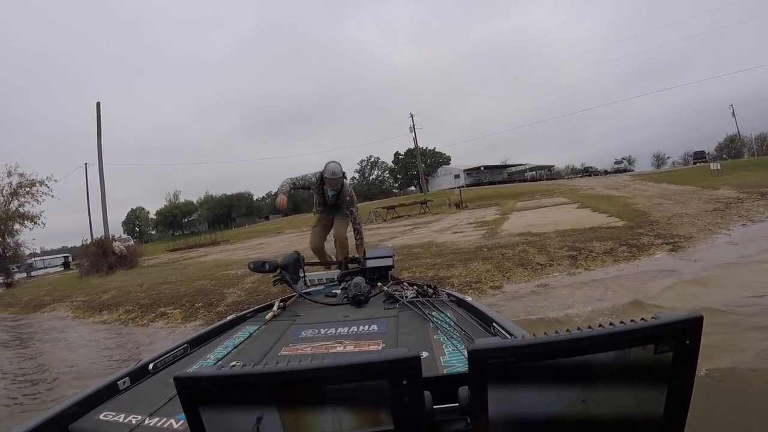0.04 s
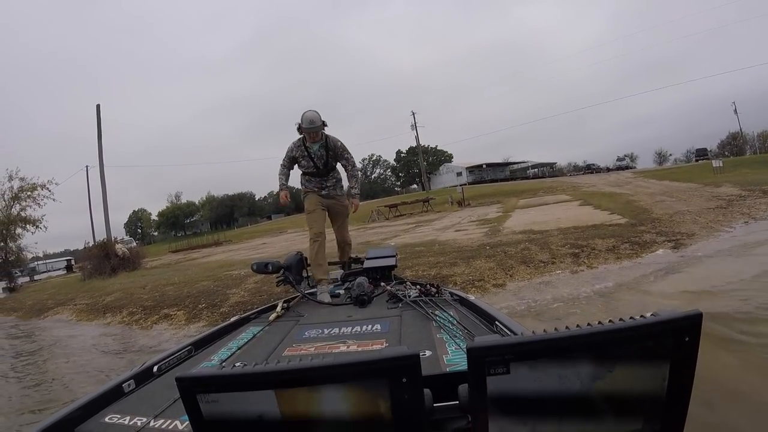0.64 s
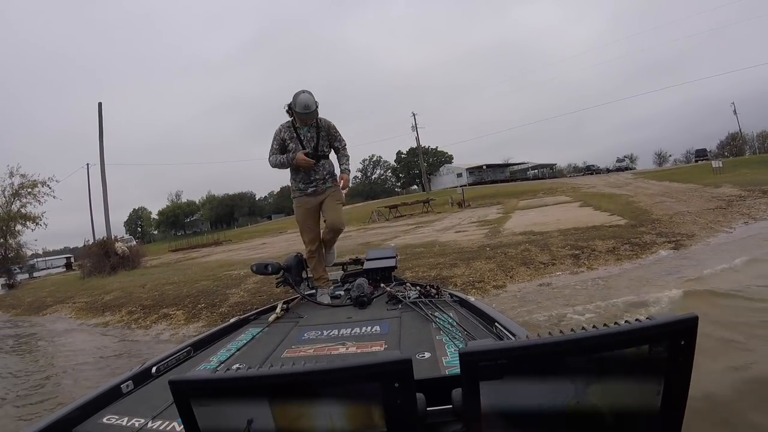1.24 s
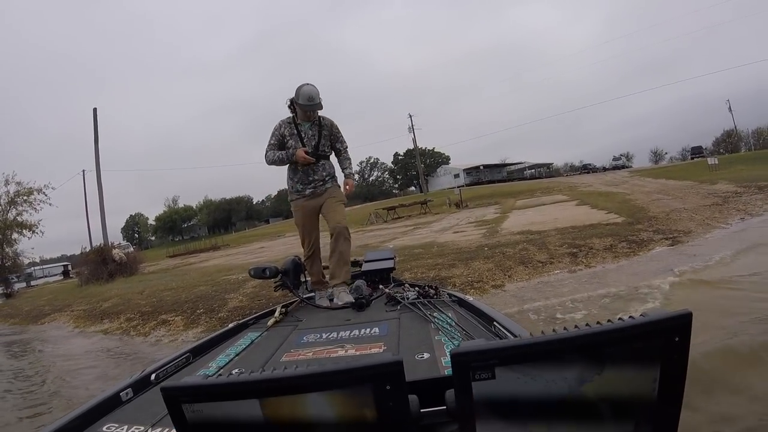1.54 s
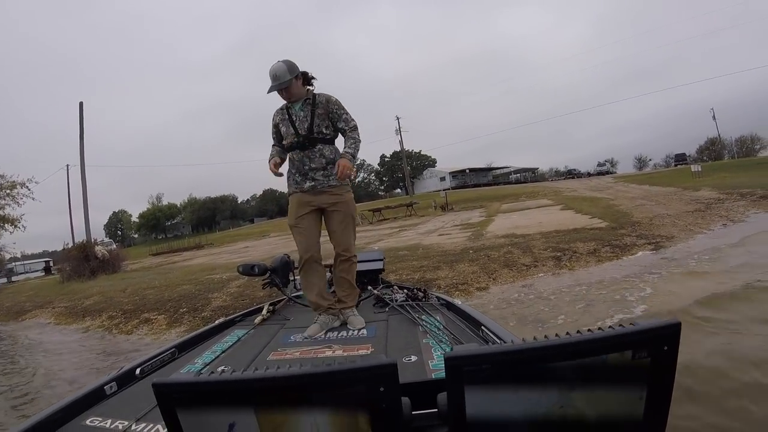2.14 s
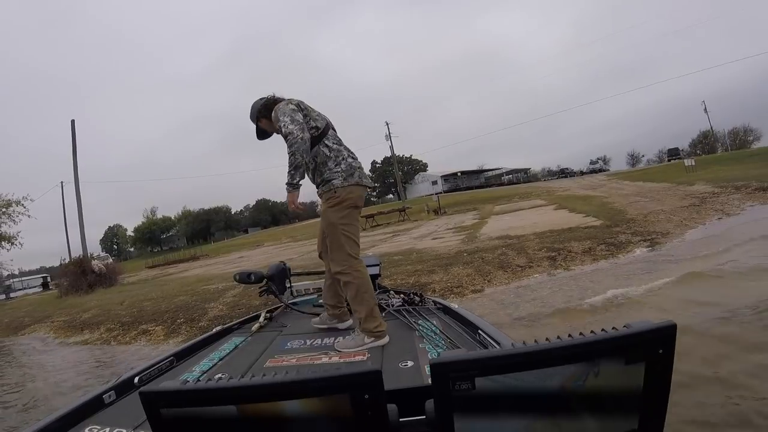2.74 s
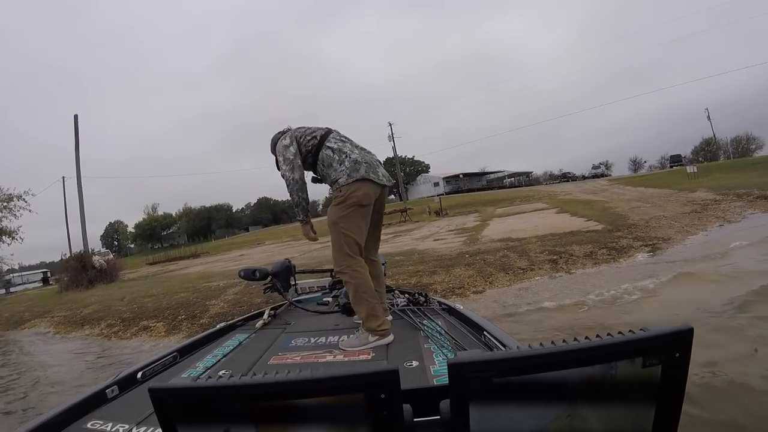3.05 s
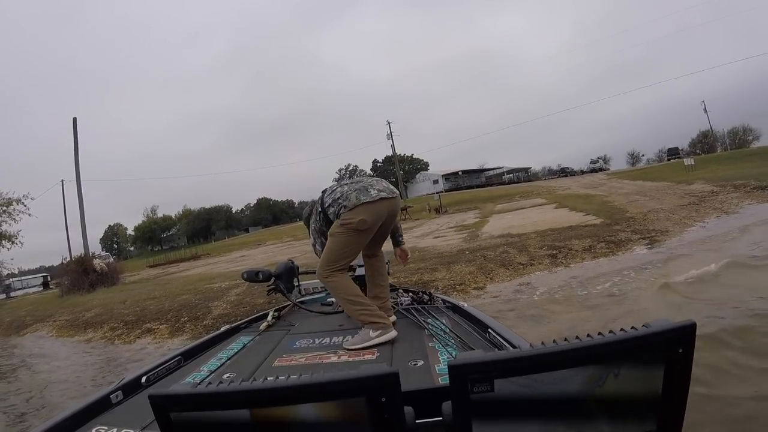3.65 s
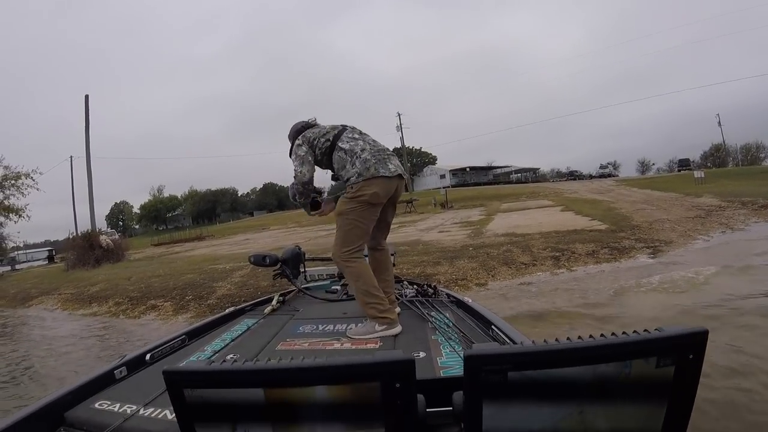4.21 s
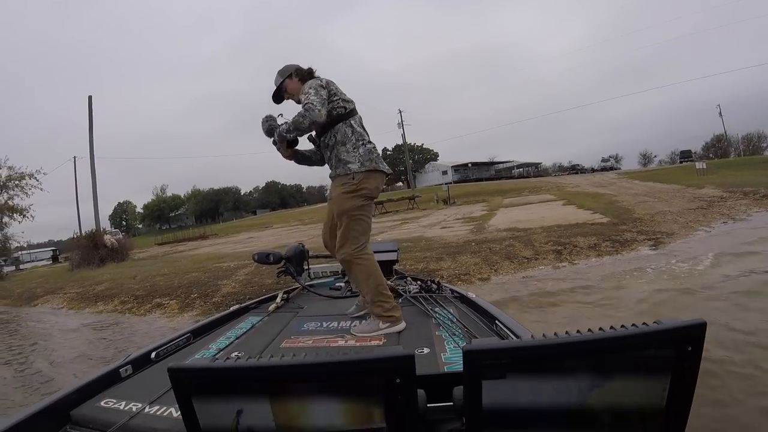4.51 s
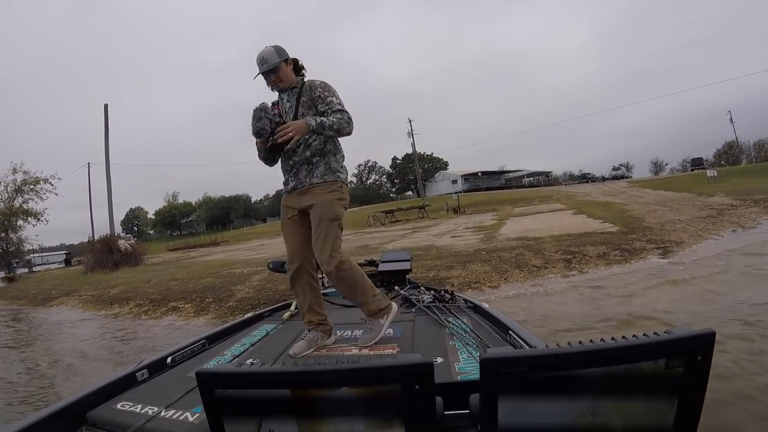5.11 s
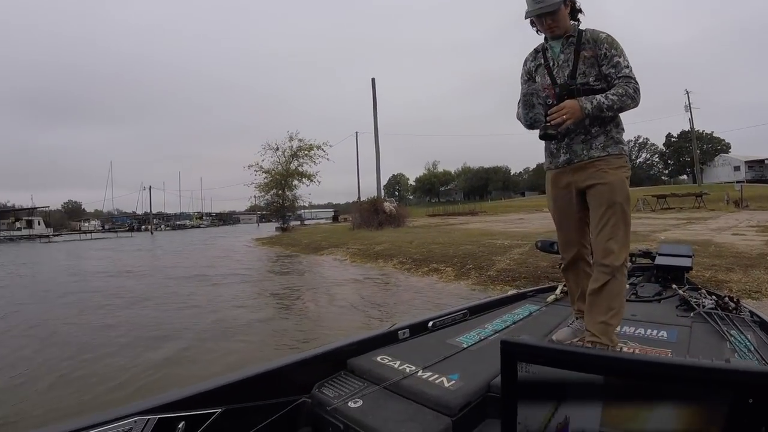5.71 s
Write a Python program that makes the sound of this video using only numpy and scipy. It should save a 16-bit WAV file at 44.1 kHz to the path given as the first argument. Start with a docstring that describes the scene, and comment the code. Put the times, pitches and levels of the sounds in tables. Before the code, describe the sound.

A boomy thud and sharp clicks sound as someone hops onto a boat deck, over the loud low hum of an outboard motor. The engine slows, climbs to a rough, whining drone about halfway through, then settles slightly. Lake water fizzes and plops around the hull while hollow footsteps, shoe scuffs and small gear clicks come and go. Gusts of wind buffet the onboard microphone more toward the end.

```python
"""An outboard motor hums through the hull of a fishing boat backing away from a lake shore.
Heard from the console, the hum swells with the throttle, the engine cover drones and clatters,
and the exhaust burbles under water. Churned water hisses and small waves plop under the hull.
Someone hops onto the bow and walks the hollow deck, soles scuff and loose gear clicks.
Wind rumbles louder as the boat gathers speed."""
import sys
import numpy as np
from scipy import signal
from scipy.fft import rfft, irfft
from scipy.io import wavfile

SR = 44100
rng = np.random.default_rng(int(sys.argv[2]) if len(sys.argv) > 2 else 0)


def generate_wav(sig):
    """Save sig (samples, or channels by samples) to the path in sys.argv[1] as 16-bit PCM at SR."""
    pcm = np.round(np.clip(np.atleast_2d(sig).T, -1, 1) * 32767).astype(np.int16)
    wavfile.write(sys.argv[1], SR, pcm)


N = 254456

# How fast the engine's crankshaft spins: (time [s], speed [turns per s])
ENGINE_SPEED = [(0.0, 39.1), (0.14, 38.3), (0.29, 34.9), (0.48, 28.5), (1.0, 30), (1.48, 31.7),
                (1.86, 37.1), (2.2, 46.3), (2.39, 47.5), (2.96, 49.7), (3.42, 56), (3.7, 54.4), (4.0, 51.1),
                (4.45, 47.8), (5.0, 46.8), (5.77, 44.1)]
def crankshaft(cruise_hz=45):
    """The shaft sets the engine's pace: its speed, its turns so far, and octaves above cruising speed."""
    speed, = in_time(ENGINE_SPEED)
    return speed, np.cumsum(speed) / SR, np.log2(speed / cruise_hz)


# How well each pitch comes through the hull: (pitch [Hz], level [dB])
HULL_RESPONSE = [(30, -15), (52, -31.5), (61, -43), (70, -57), (90, -27), (100, -21), (112, -19.5),
                 (124, -20), (142, -27.5), (158, -33.5), (188, -31), (210, -39.5), (234, -33), (262, -48),
                 (295, -41), (345, -36.5), (378, -36.5), (405, -48), (480, -50)]
# Tones of the uneven cylinders. An "order" is a multiple of the shaft's speed: (order, level [dB])
ENGINE_ORDERS = [(1, -3.5), (2, 2.5), (3, 1.5), (4, -3), (5, -12), (6, -5.5), (7, -7), (8, -4.5), (9, -15)]
def engine_hum(speed, turns, octaves, idle_hz=29, smooth_hz=42, throb_depth=0.3):
    """Each engine tone swells as it glides through a hull resonance; near idle the firing is lumpy."""
    out = np.zeros(N)
    idling = np.clip((smooth_hz - speed) / (smooth_hz - idle_hz), 0, 1)
    for order, order_db in ENGINE_ORDERS:
        flutter_db = 0.5 * drift(rate_hz=6) + 2.8 * idling * drift(rate_hz=18)
        waver = 0.2 * drift(rate_hz=27) + 0.5 * idling * drift(rate_hz=18)
        level_db = at_hz(HULL_RESPONSE, order * speed) + order_db + flutter_db
        phase = 2 * np.pi * (order * turns + rng.random()) + waver
        out += from_db(level_db) * np.sqrt(2) * np.sin(phase)
    throb = 1 + throb_depth * drift(rate_hz=45)  # uneven firing
    return from_db(-0.63 + 1.5 * octaves) * throb * out


# The engine cover's nasal drone: (time [s], centre pitch [Hz], level [dB])
LOW_DRONE = [(0.0, 770, -50), (0.45, 815, -52), (0.7, 773, -40.5), (1.0, 767, -48), (1.4, 802, -49.5),
             (1.87, 765, -38), (2.05, 814, -36), (2.4, 833, -42.5), (2.95, 837, -49), (3.12, 805, -39),
             (3.33, 800, -30), (3.48, 815, -41), (3.65, 816, -37), (3.8, 830, -47), (3.92, 770, -31),
             (4.04, 805, -42), (4.13, 850, -34.5), (4.26, 876, -34.5), (4.38, 892, -42), (4.5, 817, -34),
             (4.68, 830, -43), (5.0, 833, -48.5), (5.77, 775, -44)]
# A higher tone that joins near full throttle: (time [s], centre pitch [Hz], level [dB])
MIDDLE_WHINE = [(0.0, 940, -70), (2.9, 925, -54), (3.15, 955, -46), (3.32, 1000, -40), (3.5, 950, -47),
                (3.72, 927, -38), (3.95, 960, -52), (4.25, 1030, -48), (4.7, 1006, -53), (5.77, 1024, -71)]
# The highest, thinnest whine: (time [s], centre pitch [Hz], level [dB])
HIGH_WHINE = [(0.0, 1320, -68), (1.45, 1245, -53), (1.63, 1320, -42), (1.85, 1290, -53),
              (2.25, 1225, -42.5), (2.55, 1240, -52), (2.88, 1254, -45), (3.1, 1230, -50),
              (3.36, 1180, -37), (3.5, 1150, -43), (3.65, 1183, -39.5), (3.85, 1140, -37.5),
              (4.05, 1175, -42), (4.22, 1250, -40), (4.7, 1240, -50), (5.77, 1206, -57)]
def cover_drone(speed, turns, curve, width_hz, wobble, rough_db=1.5):
    """Close, wavering engine tones pass through one resonance of the cover and beat into a rough drone."""
    centre_hz, db = in_time(curve)
    centre_order = centre_hz / speed
    tones = np.zeros(N)
    for order in range(int(centre_order.min()), int(centre_order.max()) + 2):
        off_centre = 2 * (order * speed - centre_hz) / width_hz
        phase = 2 * np.pi * (order * turns + rng.random()) + wobble * drift(rate_hz=14)
        tones += from_db(rough_db * drift(rate_hz=30)) * np.sin(phase) / (1 + off_centre ** 4)
    return from_db(db) * rms_one(tones)


# The deep tone of the underwater exhaust: (pitch [Hz], relative level [dB])
EXHAUST_SPECTRUM = [(45, 1.5), (80, 4), (120, -0.5), (175, 1), (215, -5), (265, -10), (310, -8.5),
                    (375, -12), (420, -24.5), (620, -34), (1000, -36.5)]
def exhaust(turns, octaves, pulse_depth=0.44):
    """Gas leaves the propeller hub in lumps, three firings a turn, louder as the engine speeds up."""
    pulses = 1 + pulse_depth * np.cos(2 * np.pi * 3 * turns)
    gas = rng.standard_normal(N) * pulses * from_db(-1.5 * drift(rate_hz=6.2))
    return from_db(-24.5 + 10 * octaves) * colour(gas, EXHAUST_SPECTRUM)


# How hard the engine works, heard as the loudness of its clatter: (time [s], level [dB])
ENGINE_LOAD = [(0.0, -41.5), (0.63, -38.5), (0.79, -38.5), (1.04, -38), (1.49, -41), (2.04, -35),
               (3.05, -32), (3.21, -32.5), (3.55, -32), (3.81, -32), (5.41, -37), (5.77, -37)]
# The tone of rushing air and tapping valves: (pitch [Hz], relative level [dB])
CLATTER_SPECTRUM = [(300, -3.5), (520, 6.5), (620, 4), (690, 1.5), (810, 7), (1040, 0), (1270, 0),
                    (1600, -5), (2100, -11), (2800, -19), (4000, -34), (8000, -46)]
# Pitches at which the engine cover rings: (pitch [Hz], width [Hz], relative level [dB])
COVER_RESONANCES = [(770, 33, -17), (815, 30, -17), (917, 18, -14), (1004, 70, -13.5), (1118, 40, -10.5),
                    (1177, 70, -20.5), (1350, 82, -18.5), (1767, 48, -17.5), (3560, 38, -29.5)]
def engine_clatter(turns, pulse_depth=0.042):
    """Valve taps and rushing air, which throbs three times a turn, set the engine cover ringing."""
    load_db, = in_time(ENGINE_LOAD)
    pulses = 1 + pulse_depth * np.cos(2 * np.pi * 3 * turns)
    inner_air, outer_air = pulses * from_db(2 * drift(rate_hz=42)) * rng.standard_normal((2, N))
    taps = valve_taps(turns)
    shake = taps + inner_air / 2
    cover = sum(from_db(db) * rms_one(resonate(shake, hz, width)) for hz, width, db in COVER_RESONANCES)
    rush = colour(outer_air + from_db(-11) * taps, CLATTER_SPECTRUM)
    return from_db(load_db + 0.26) * rush + from_db(load_db - 7.5) * cut(cover, 3830, "low")


def valve_taps(turns, taps_per_turn=36, jitter_s=0.00006):
    """A round of uneven taps repeats every turn, each slowly changing in strength, never quite on time."""
    chance = rng.standard_normal((int(turns[-1]) + 21, taps_per_turn))
    strength = signal.lfilter([1], [1, -0.85], chance, axis=0)[20:].ravel()  # 20 turns to settle
    due_turns = np.arange(int(turns[-1] * taps_per_turn)) / taps_per_turn
    when = np.interp(due_turns, turns, np.arange(N)) + jitter_s * SR * rng.standard_normal(len(due_turns))
    samples = np.clip(when, 0, N - 1).astype(int)
    return rms_one(np.bincount(samples, strength[:len(samples)], N))


# Feet landing on the deck: (time [s], contact level [dB], brightness [Hz], boom level [dB])
FOOTFALLS = [(0.2985, -14.5, 2400, -42), (0.3024, -8.5, 1900, -25), (0.3112, -11.5, 900, -6.5),
             (0.342, -15, 300, -16.5), (0.3623, -17, 1400, -29), (0.862, -24.5, 760, -22),
             (1.19, -27, 600, -31), (2.576, -18, 1390, -20), (3.054, -21.5, 1700, -19),
             (4.607, -25, 900, -16), (4.745, -21, 1100, -20), (5.324, -20, 350, -14),
             (5.427, -15, 400, -14.5), (5.682, -14.5, 600, -8.5)]
# Pitches at which the deck lids ring: (pitch [Hz], relative level [dB], time to fade by 60 dB [s])
LID_RESONANCES = [(161.2, 5, 0.38), (251, -6, 0.27), (329, -2, 0.069), (376, -4.5, 0.053),
                  (547, -15, 0.082), (623, -6, 0.081), (806.5, -1, 0.086), (933, -1.5, 0.073),
                  (968, -4.5, 0.089), (1226, 0, 0.028), (1353, 5, 0.044), (1810, -7.5, 0.036),
                  (2300, -7, 0.041), (3430, -21, 0.03)]
def footsteps(boom_hz=58, boom_fade_s=0.41, scatter_db=1.5):
    """A foot lands: the lids knock, the carpeted deck thuds and the hollow hull booms under the weight."""
    out, t = np.zeros(N), np.arange(SR // 2) / SR
    tap = 1.0 * (t == 0)
    sinking_hz = boom_hz * (1 + 0.58 * np.exp(-t / 0.027))  # the pitch sinks as the bent deck relaxes
    boom = np.sin(2 * np.pi * np.cumsum(sinking_hz) / SR) * die_away(t, boom_fade_s)
    for s, contact_db, bright_hz, boom_db in FOOTFALLS:
        grit, panels, cavity = rng.standard_normal((3, len(t)))
        contact = cut(tap + 0.0315 * grit * np.exp(-t / 0.0098), bright_hz, "low")
        knock = np.zeros(len(t))
        for k, (hz, db, fade_s) in enumerate(LID_RESONANCES):
            strength = from_db(db + scatter_db * rng.standard_normal())
            knock += (-1) ** k * strength * ring(contact, hz, fade_s)
        thud_band_hz = [150, np.clip(bright_hz, 300, 1400)]
        thud = rms_one(cut(panels, thud_band_hz, "band", order=3)) * np.exp(-t / 0.024)
        # a crowd of higher hull resonances that die sooner than the boom
        hollow = rms_one(cut(cavity, [150, 400], "band")) * np.exp(-t / 0.031)
        deck = from_db(-10) * knock + from_db(-9.5) * cut(thud, 2200, "low")
        hull = cut(boom + from_db(-12.5) * hollow, 1400, "low")
        add(out, s, from_db(contact_db) * deck + from_db(boom_db) * hull)
    return out


# Small waves hitting the hull: (time [s], level [dB], starting pitch [Hz])
WAVE_SLAPS = [(0.575, -20, 286), (0.655, -19, 263), (1.632, -26, 436), (2.31, -19, 352),
              (2.345, -16.5, 375), (5.425, -29, 394)]
def wave_slaps(rise_s=0.0019, fade_s=0.062, glide_per_s=0.69):
    """A wave traps a pocket of air under the hull; it rings with a short plop that rises in pitch."""
    out, t = np.zeros(N), np.arange(SR // 4) / SR
    envelope = (1 - np.exp(-t / rise_s)) * die_away(t, fade_s)
    for s, db, hz in WAVE_SLAPS:
        phase = 2 * np.pi * hz * t * (1 + glide_per_s * t / 2)
        add(out, s, from_db(db) * envelope * np.sin(phase))
    return out


# The bright tone of churned water: (pitch [Hz], relative level [dB])
WASH_SPECTRUM = [(700, -18.5), (1500, 18), (2500, 14), (4100, 3.5), (4900, 7.5), (6000, 5), (7000, -3.5),
                 (9000, -8.5), (10800, -22), (14000, -4)]
# Water surging along the hull: (time of the crest [s], length [s], rise [dB])
WATER_SURGES = [(0.83, 0.21, 5.5), (1.28, 0.37, 3), (2.66, 0.37, 5), (3.1, 0.43, 3.5), (3.97, 0.58, 3),
                (4.88, 0.35, 2), (5.41, 0.11, 1), (5.69, 0.12, 2)]
def wash(octaves, bubbles_per_s=1500, spray_hz=7000, boat_lag_s=0.88):
    """Churned water hisses and fizzes with bursting bubbles; surges lift it and throw bright spray."""
    spray = colour(cut(rng.standard_normal(N), spray_hz, "high", order=4), WASH_SPECTRUM)
    sizes = from_db(3.5 * np.minimum(rng.exponential(1, N), 3)) * rng.choice([-1, 1], N)
    bursts = rng.random(N) < bubbles_per_s * from_db(3 * drift(rate_hz=12)) / SR
    slosh = from_db(1.5 * drift(rate_hz=12))
    hiss = slosh * colour(rng.standard_normal(N) + rms_one(sizes * bursts), WASH_SPECTRUM)
    surge = from_db(swells(WATER_SURGES))
    boat_octaves = lagged(octaves, boat_lag_s)  # the boat's speed trails the engine's
    return from_db(-46.5 + 3.5 * boat_octaves) * (surge * hiss + (surge - 1) * from_db(-11) * spray)


# Loose gear: (time [s], ring level [dB], ring pitch [Hz], crack level [dB], rattle length [s])
GEAR_CLICKS = [(0.3204, -34, 9800, -19, 0.00085), (0.3308, -27, 3220, -24.5, 0.0032),
               (0.3384, -37, 3280, -24, 0.0015), (0.488, -46, 5000, -56, 0.0039),
               (0.888, -48, 7000, -58, 0.001), (1.137, -33, 5300, -45, 0.0016),
               (1.215, -45, 5200, -56, 0.001), (1.324, -39.5, 5000, -56, 0.002),
               (2.118, -49, 5000, -31.5, 0.022), (3.047, -42, 5450, -55, 0.001),
               (3.122, -38, 5350, -48, 0.001), (4.79, -53, 6400, -38, 0.002),
               (5.373, -46, 6060, -52, 0.003)]
def gear_clicks(ticks_per_s=1.4, tick_db=-56, tick_hz=5000):
    """Small hard parts snap and rattle, and fainter ticks come at random."""
    out = np.zeros(N)
    for s, ring_db, hz, crack_db, hold_s in GEAR_CLICKS:
        add(out, s, snap(hz, hold_s, ring_db, crack_db))
    for when, size, pitch in rng.random((round(ticks_per_s * N / SR), 3)):
        tick = snap(tick_hz * 2 ** (pitch - 0.5), hold_s=0, ring_db=tick_db, crack_db=tick_db)
        add(out, when * (N - 1) / SR, (0.5 + size) * tick)
    return out


def snap(hz, hold_s, ring_db, crack_db, rise_s=0.001, fade_s=0.019):
    """One click: a broad crack and a ringing pitch rise at once, hold and die away."""
    t = np.arange(SR // 8) / SR
    grit = rng.standard_normal(len(t))
    crack = cut(cut(grit, 1800, "high"), 5700, "low")
    envelope = (1 - np.exp(-t / rise_s)) * die_away(np.maximum(t - hold_s, 0), fade_s)
    return envelope * (from_db(ring_db) * focus(grit, hz, sharpness=2.8) + from_db(crack_db) * crack)


# Soles scuffing and cloth brushing: (time of the crest [s], half length [s], level [dB], pitch [Hz])
RUBS = [(4.742, 0.03, -34, 1550), (4.828, 0.012, -52, 4200), (4.88, 0.1, -60, 4700),
        (5.396, 0.08, -59, 8200), (5.587, 0.02, -40, 1400), (5.663, 0.0078, -51, 4630),
        (5.707, 0.016, -38.5, 1620), (5.734, 0.014, -37.5, 1720)]
def scuffs(slips_per_s=1800):
    """A short rub is a run of tiny slips that swells and fades around one pitch."""
    out = np.zeros(N)
    for s, half_s, db, hz in RUBS:
        stroke = np.hanning(round(2 * half_s * SR))
        slips = rng.standard_normal(SR) * (rng.random(SR) < slips_per_s / SR)
        rub = focus(slips, hz, sharpness=4.5)[:len(stroke)]
        add(out, s - half_s, from_db(db) * stroke * rub)
    return out


# The low rumble of wind: (pitch [Hz], relative level [dB])
WIND_SPECTRUM = [(16, -5), (26, 0), (55, -1), (75, -3), (100, -8), (135, -13), (200, -25), (300, -45)]
# Gusts and one slight lull: (time of the crest [s], length [s], level change [dB])
WIND_GUSTS = [(1.42, 0.39, -1), (3.1, 0.44, 1.5), (4.0, 0.71, 5.5), (5.15, 0.73, 4), (5.65, 0.35, 3.5)]
def wind(growth_db_per_s=0.77):
    """Wind buffets the microphone in gusts and grows as the boat gathers speed."""
    level_db = -21.5 + growth_db_per_s * np.arange(N) / SR + swells(WIND_GUSTS)
    return from_db(level_db) * colour(rng.standard_normal(N), WIND_SPECTRUM)


def from_db(db):
    """Turn decibels into a number to multiply by."""
    return 10 ** (np.asarray(db) / 20)


def rms_one(x):
    """Scale a signal so that its average strength (rms) is 1."""
    return x / np.sqrt(np.mean(x ** 2) + 1e-20)


def die_away(t, fade_s):
    """A fade that falls by 60 dB every fade_s seconds."""
    return np.exp(-np.log(1000) * t / fade_s)


def in_time(rows):
    """Join a table's timed points with straight lines: one curve for each column after the time."""
    s, *columns = np.transpose(rows)
    return [np.interp(np.arange(N) / SR, s, column) for column in columns]


def at_hz(spectrum, hz):
    """Read a spectrum's level at a pitch, with the octaves evenly spaced."""
    pitches, levels = np.transpose(spectrum)
    return np.interp(np.log(hz), np.log(pitches), levels)


def swells(rows):
    """Bell-shaped changes in level, in dB at every sample."""
    t = np.arange(N) / SR
    return sum(db * np.exp(-(2 * (t - s) / length_s) ** 2) for s, length_s, db in rows)


def drift(rate_hz, stride=40, settle=2000):
    """A smooth random wander with a typical size of 1."""
    r = np.exp(-2 * np.pi * rate_hz * stride / SR)
    chance = rng.standard_normal(N // stride + settle + 2)
    slow = signal.lfilter([1], [1, -2 * r, r * r], chance)[settle:]
    return np.interp(np.arange(N) / stride, np.arange(len(slow)), rms_one(slow))


def lagged(x, lag_s):
    """Follow a curve sluggishly, as a heavy thing does."""
    keep = np.exp(-1 / (lag_s * SR))
    return x[0] + signal.lfilter([1 - keep], [1, -keep], x - x[0])


def colour(x, spectrum):
    """Shape a sound with a spectrum that falls away beyond its ends; the result has rms 1."""
    hz = np.maximum(np.arange(N // 2 + 1) * SR / N, 1)
    skirts = np.minimum(1, hz / spectrum[0][0]) ** 2 * np.minimum(1, spectrum[-1][0] / hz) ** 2
    return rms_one(irfft(rfft(x) * from_db(at_hz(spectrum, hz)) * skirts, N))


def resonate(x, hz, width_hz):
    """A resonance: one pitch passes at full strength and the rest are weakened."""
    r, w = np.exp(-np.pi * width_hz / SR), 2 * np.pi * hz / SR
    return signal.lfilter(np.array([1, 0, -1]) * (1 - r * r) / 2, [1, -2 * r * np.cos(w), r * r], x)


def focus(x, hz, sharpness):
    """Narrow a noise around one pitch by resonating it twice; the result has rms 1."""
    width_hz = hz / sharpness
    return rms_one(resonate(resonate(x, hz, width_hz), hz, width_hz))


def ring(x, hz, fade_s):
    """Each push sets a pure tone ringing, which falls by 60 dB in fade_s seconds."""
    r, w = die_away(1 / SR, fade_s), 2 * np.pi * hz / SR
    return signal.lfilter([0, np.sin(w)], [1, -2 * r * np.cos(w), r * r], x + 1e-18)


def cut(x, hz, kind, order=2):
    """Keep the "low" part, the "high" part or a "band" of a sound."""
    return signal.sosfilt(signal.butter(order, hz, kind, fs=SR, output="sos"), x)


def add(out, s, sound):
    """Mix a short sound in, starting at s seconds."""
    at = round(s * SR)
    out[at:at + len(sound)] += sound[:N - at]


def scene(bite_s=0.14, bite_takes_s=0.17):
    """Mix engine, water, deck and wind into one channel; the shaft's speed drives engine and wash."""
    t = np.arange(N) / SR
    speed, turns, octaves = crankshaft()
    # exhaust and wash are 2 dB quieter until the propeller bites the water
    bite = from_db(-2 * np.clip(1 - (t - bite_s) / bite_takes_s, 0, 1))
    engine = engine_hum(speed, turns, octaves) + bite * exhaust(turns, octaves) + engine_clatter(turns)
    engine += cover_drone(speed, turns, LOW_DRONE, width_hz=95, wobble=0.95)
    engine += cover_drone(speed, turns, MIDDLE_WHINE, width_hz=95, wobble=0.95)
    engine += cover_drone(speed, turns, HIGH_WHINE, width_hz=130, wobble=1.0)
    air = wind()
    water = bite * wash(octaves) + wave_slaps()
    deck = footsteps() + gear_clicks() + scuffs()
    return (engine + water + deck + air)[None]


def record(dry, hiss_db=-59.5, housing_hz=11200, leak=0.18, top_hz=14900, edge_s=0.003):
    """Add a faint hiss; a housing dulls the highest treble; peaks are rounded and the very top is cut."""
    t = np.arange(N) / SR
    edge_fade = np.sin(np.pi / 2 * np.minimum(1, np.minimum(t, t[::-1]) / edge_s)) ** 2
    sound = edge_fade * (dry + from_db(hiss_db) * rng.standard_normal(N))
    dulled = cut(sound, housing_hz, "low", order=12) + leak * cut(sound, housing_hz, "high", order=12)
    rounded = 0.95 * np.tanh(dulled / 0.95)
    return signal.sosfilt(signal.ellip(9, 0.2, 70, top_hz, fs=SR, output="sos"), rounded)


dry = scene()
out = record(dry)
generate_wav(out)
```